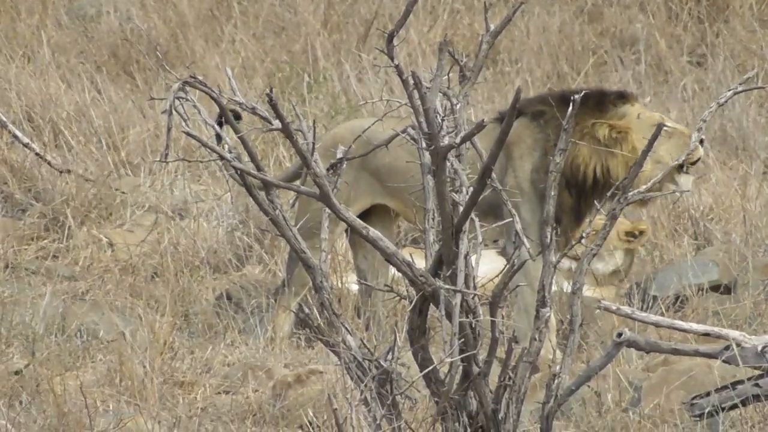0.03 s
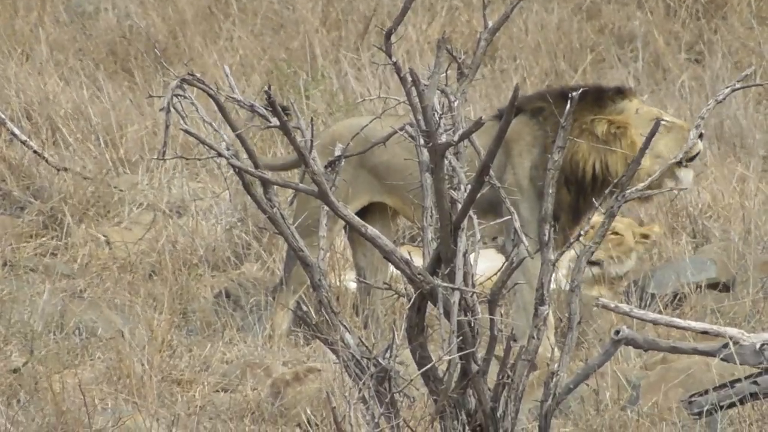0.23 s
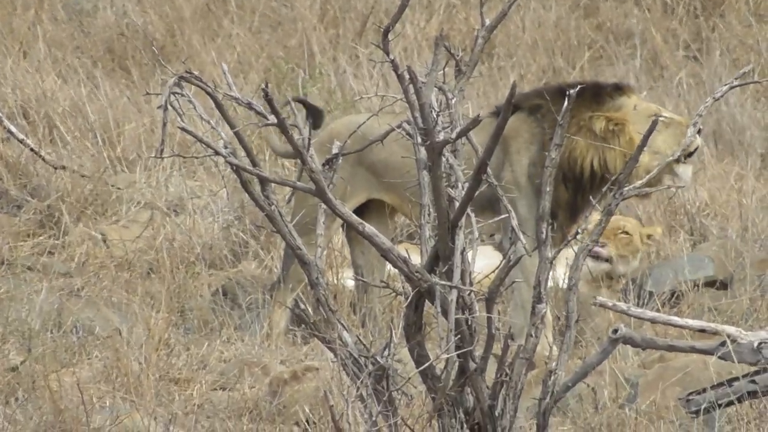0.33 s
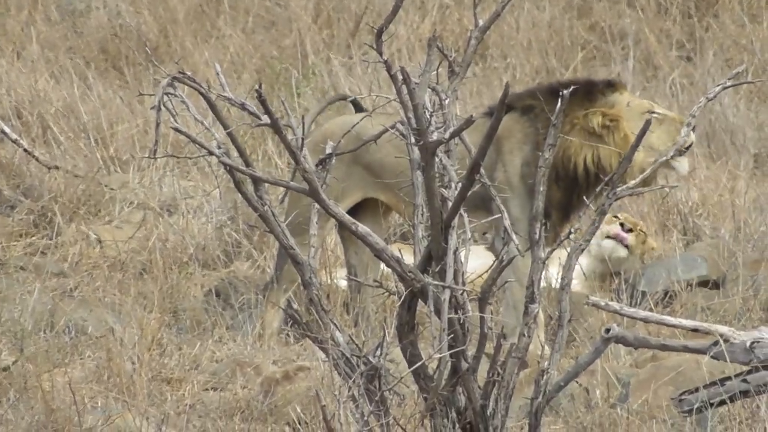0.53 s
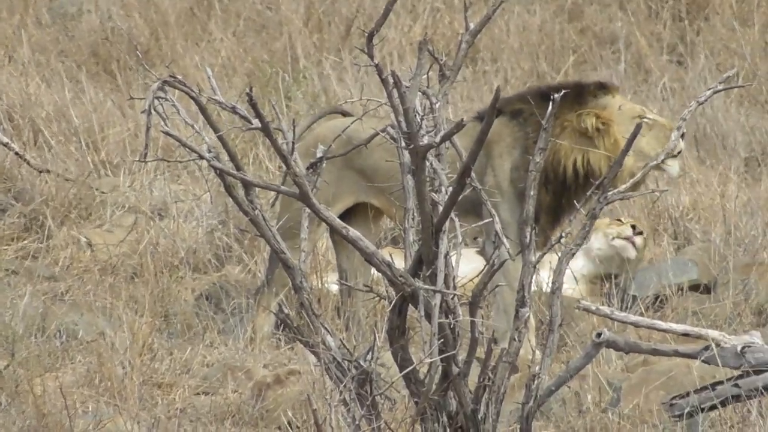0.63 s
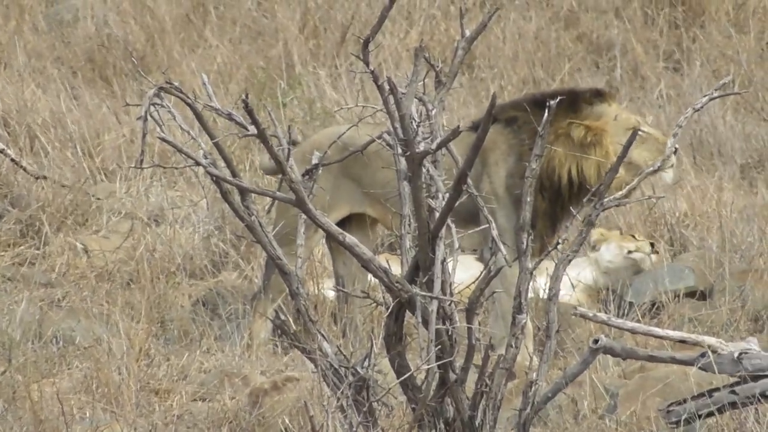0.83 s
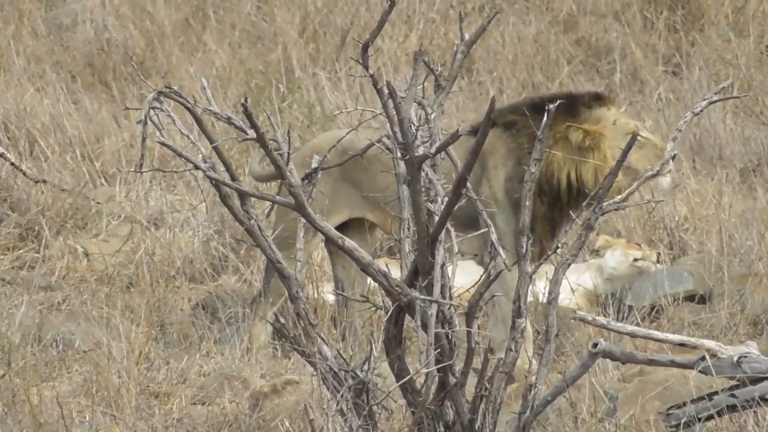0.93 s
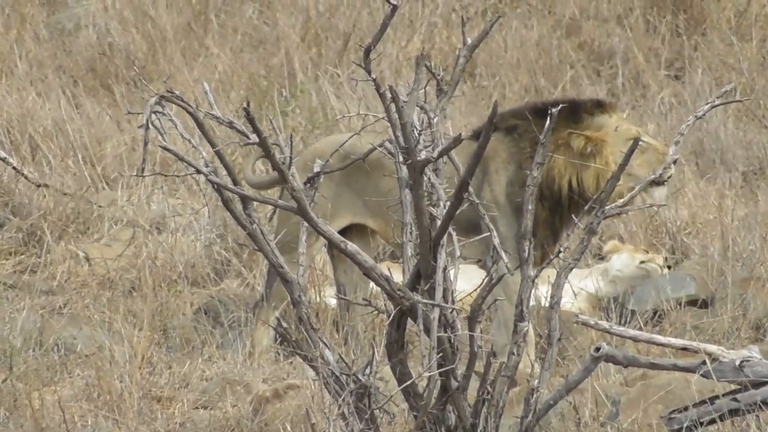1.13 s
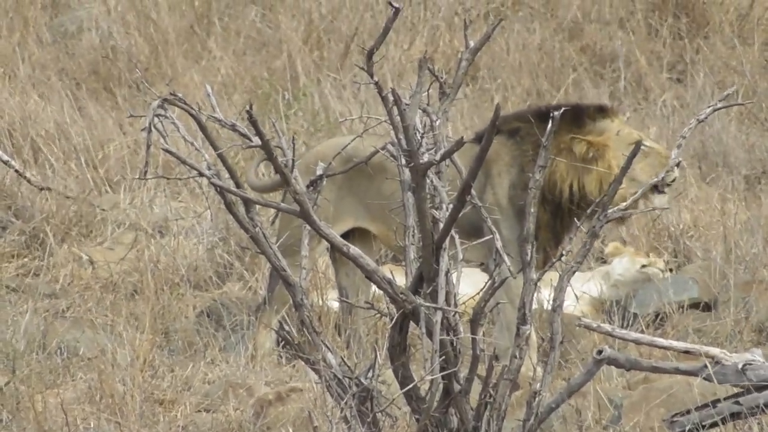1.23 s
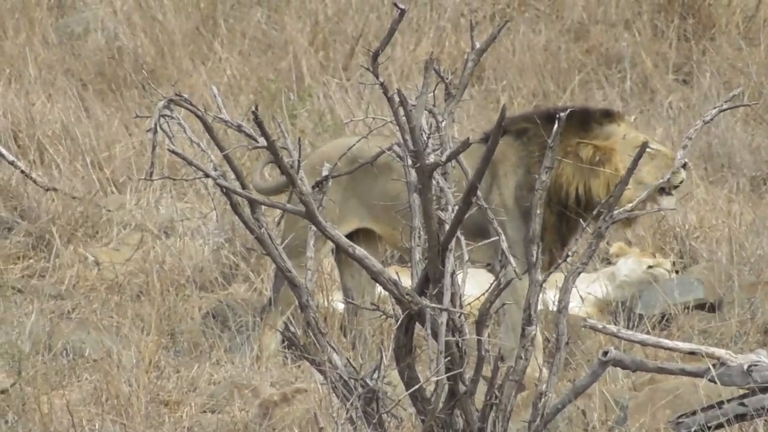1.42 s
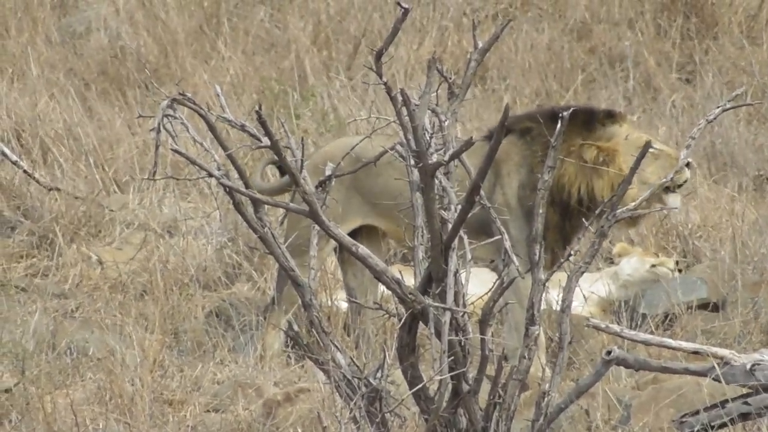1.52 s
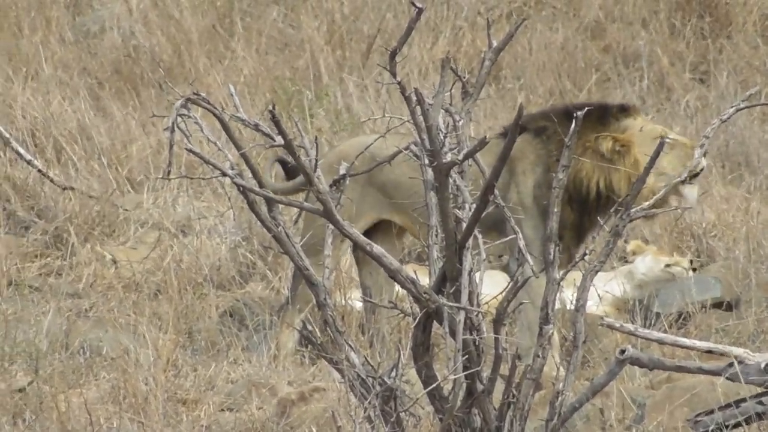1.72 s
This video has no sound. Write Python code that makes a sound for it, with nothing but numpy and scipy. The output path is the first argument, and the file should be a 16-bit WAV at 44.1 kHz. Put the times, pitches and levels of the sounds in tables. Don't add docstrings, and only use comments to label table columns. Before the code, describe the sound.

A lion some way off gives one low moan that rises, sags and closes in a breathy rasp; faint echoes follow in open dry bush, wind buffets the handheld microphone, then a hand bumps the camera.

```python
import sys
import numpy as np
from scipy import signal
from scipy.fft import rfft, irfft
from scipy.io import wavfile
from scipy.ndimage import uniform_filter1d

SR = 44100
rng = np.random.default_rng(int(sys.argv[2]) if len(sys.argv) > 2 else 0)


def inscribe(sig):
    pcm = np.round(np.clip(np.atleast_2d(sig).T, -1, 1) * 32767)
    wavfile.write(sys.argv[1], SR, pcm.astype(np.int16))


def gain_from_db(level_db):
    decades = np.asarray(level_db, float) / 20
    return 10 ** decades


N = 79380
T = np.arange(N) / SR
RATTLE_S = 1.429

# (frequency [Hz], width [Hz], level [dB])
THROAT = [(433, 247, -7), (608.4, 107, 0.5), (827, 180, -21.5), (1180, 123, -16), (1367, 78, -20)]


def evened(x):
    return x / np.sqrt(np.mean(x ** 2) + 1e-20)


def read(points, hz):
    f, value = np.transpose(points)
    return np.interp(np.log(hz + 1), np.log(f + 1), value)


def curve(points):
    return np.interp(T, *np.transpose(points))


def hump(s, length):
    return np.exp(-.5 * ((T - s) / length) ** 2)


def wander(span):
    return evened(uniform_filter1d(uniform_filter1d(rng.standard_normal(N), span), span))


def resonance_gain(hz, peaks):
    return sum(gain_from_db(db) / (1 + (2 * (hz - f) / width) ** 2) for f, width, db in peaks)


def coloured(x, peaks):
    gain = resonance_gain(np.fft.rfftfreq(N, 1 / SR), peaks)
    return evened(irfft(rfft(x) * gain, N))


def port_turn(hz):
    # (frequency [Hz], left port's lead [rad])
    lead = [(30, 0), (150, 0.06), (700, 0.7), (1460, 0.4), (3000, 0.2), (9000, 0.1), (12000, 1)]
    # (frequency [Hz], left minus right [dB])
    lean = [(60, -1), (200, -2.67), (700, -0.4), (1290, 2), (2400, 1.5), (4400, -0.5)]
    return np.exp(.5j * read(lead, hz)) * gain_from_db(read(lean, hz) / 2)


def ports(x):
    turn = port_turn(np.fft.rfftfreq(N, 1 / SR))
    return irfft(rfft(x) * np.array([turn, 1 / turn]), N)


def bed(spectrum, level_db, low_hz, high_hz, swell_db):
    # (frequency [Hz], left-right likeness [0-1])
    likeness = [(30, 0.6), (80, 0.85), (300, 0.88), (640, 1), (1400, 1), (2200, 0.97), (3500, 0.98),
                (6000, 1), (8500, 0.83), (12000, 0.069)]
    patch_db, flicker_db = 0.77, 0.5
    frames, hz = N // 256 + 5, np.fft.rfftfreq(1024, 1 / SR)
    a, b, c, d, patches = rng.standard_normal((frames, 513, 5)).T
    patches = evened(uniform_filter1d(uniform_filter1d(patches, size=8, axis=0), size=8, axis=1))
    flicker = evened(uniform_filter1d(rng.standard_normal(frames), size=2))

    same = np.clip(read(likeness, hz), -1, 1)[:, None]
    left = a + 1j * b
    right = same * left + np.sqrt(1 - same ** 2) * (c + 1j * d)
    turn = port_turn(hz)[:, None]
    z = np.array([left * turn, right / turn])

    level = read(spectrum, hz)[:, None] + patch_db * patches + flicker_db * flicker
    band = ((hz > low_hz) & (hz <= high_hz))[:, None]
    noise = signal.istft(z * gain_from_db(level) * band, nperseg=1024, noverlap=768)[1][:, :N]
    return gain_from_db(level_db + swell_db) * evened(noise)


def wind():
    # (frequency [Hz], density [dB per Hz])
    blow = [(15, -1), (32, 9.5), (60, -7), (110, -11), (180, -3.5), (300, -25.5)]
    # (time [s], level [dB])
    strength = [(0, 5.5), (.2, 4.5), (.3, 3), (.7, -1), (.8, 6.5), (1.0, 2.5), (1.25, 1.5), (1.6, 0),
                (1.72, 6), (1.8, 1)]
    return bed(blow, -45, 12, 300, curve(strength) + 1.54 * wander(1500))


def wash():
    # (frequency [Hz], density [dB per Hz])
    spectrum = [(110, -32), (180, -5.5), (393, -4), (415, -7.5), (605, -6.5), (723, -11), (889, -11),
                (1700, -28), (2210, -56), (3740, -120)]
    return bed(spectrum, -46.5, 170, 1600, 2 - 1.5 * T)


def hiss():
    # (frequency [Hz], density [dB per Hz])
    spectrum = [(1500, -4), (1900, -2.5), (2820, -9.5), (3700, -8), (5000, -16), (8400, -5), (11000, -10.5),
                (15800, -12)]
    return bed(spectrum, -58, 1600, 15800, 0)


def air():
    lean_db = -1.0
    return (wind() + wash()) * gain_from_db(lean_db * np.array([[.5], [-.5]])) + hiss()


def chest_tone(angle, effort_db):
    # (time [s], length [s], depth [0-1], strong-weak pulses [0-1])
    catches = [
        (.257, .012, .6, 0),
        (.78, .013, .38, .2),
    ]
    grip = 1 - sum(hump(s, n) * (deep + sub * np.cos(angle / 2)) for s, n, deep, sub in catches)
    level_db = uniform_filter1d(effort_db, size=600) + 0.53 * wander(400)
    return np.sqrt(2) * gain_from_db(level_db) * grip * np.sin(angle)


def throat_partials(hz, angle, stretch):
    shimmer_db, loosen_s, loosen_len_s = 1.2, .76, .012
    smear = .16 + .4 * np.maximum(T - .4, 0)
    partials = np.zeros(N)
    for k in range(3, 12):
        gain = resonance_gain(k * hz / stretch, THROAT) * gain_from_db(shimmer_db * wander(500))
        blur = smear * np.sqrt(max(k - 4, 0)) * 2 * wander(350)
        partials += gain * np.sin(k * angle + blur + 2 * np.pi * rng.random())
    return partials * (0.24 + 0.82 / (1 + np.exp((T - loosen_s) / loosen_len_s)))


def throat_breath(angle):
    return coloured((1 + 0.81 * np.cos(angle)) * rng.standard_normal(N), THROAT)


def closing_rasp():
    # (time [s], length [s], level [dB])
    puffs = [
        (.66, .04, -59),
        (.725, .02, -55),
        (.838, .014, -47.5),
        (.885, .016, -55),
        (.93, .03, -57),
        (1.04, .06, -61),
    ]
    # (frequency [Hz], width [Hz], level [dB])
    rasp = [(766, 210, 16), (1330, 370, 9.5), (2140, 180, 3), (3570, 440, -1), (4440, 660, -9.5),
            (6050, 1500, -11)]
    level = sum(gain_from_db(db) * hump(s, n) for s, n, db in puffs)
    return level * gain_from_db(2.5 + 1.9 * wander(300)) * coloured(rng.standard_normal(N), rasp)


def lion():
    # (time [s], pitch [Hz])
    pitch = [(.18, 123.1), (.29, 155.8), (.36, 172.5), (.42, 178), (.49, 170.5), (.54, 156), (.64, 146.5),
             (.75, 140.5), (.84, 128.6)]
    # (time [s], chest tone [dB])
    effort = [(.17, -44), (.225, -28.5), (.35, -28.5), (.39, -23.5), (.52, -23.5), (.58, -19), (.825, -20),
              (.865, -28.5), (.895, -41.5)]
    # (time [s], mouth opening [dB], throat stretch [factor])
    mouth = [(.16, -8.5, 0.72), (0.226, 0.5, 0.73), (0.289, 2, 0.94), (.4, -0.5, 0.99), (.5, 0, 0.98),
             (.6, 1, 1.0), (.715, 3, 1.04), (.75, -0.5, 1.18), (0.859, -0.5, 1.1)]
    hz = uniform_filter1d(curve(pitch), size=1300) * (1 + 0.0062 * wander(250))
    angle = 2 * np.pi * np.cumsum(hz) / SR
    when, open_db, stretch = np.transpose(mouth)
    open_db, stretch = np.interp(T, when, open_db), np.interp(T, when, stretch)

    chest = chest_tone(angle, curve(effort))
    partials = gain_from_db(-40.5) * np.sqrt(2) * throat_partials(hz, angle, stretch)
    breath = gain_from_db(-46.5) * throat_breath(angle)
    on = (T > effort[0][0]) * np.clip(1 - (T - effort[-1][0]) / .02, 0, 1)
    return on * (chest + gain_from_db(open_db) * (partials + breath)) + closing_rasp()


def bush(x):
    t60_s = .9
    t = np.arange(SR) / SR
    hits = rng.choice([-1., 1.], (2, SR)) * (rng.random((2, SR)) < .04)
    taps = hits * gain_from_db(-60 * t / t60_s) * (t > .02)
    taps = 0.23 * taps[:1] + .5 * taps
    return signal.fftconvolve(x[None], taps / np.linalg.norm(taps[0]), axes=1)[:, :N]


def slope_echoes():
    # (time [s], length [s], level [dB], frequency [Hz])
    echoes = [
        (.93, .018, -42, 146),
        (1.009, 0.0077, -40, 145),
        (1.065, 0.013, -37, 144),
        (1.163, .025, -41.5, 141),
    ]
    return sum(np.sqrt(2) * gain_from_db(db) * hump(s, n) * np.sin(2 * np.pi * f * T) for s, n, db, f in echoes)


def knocks():
    # (time [s], peak [dB], ring [Hz], left minus right [dB])
    hits = [
        (1.4185, -29, 110, 0),
        (1.4260, -14.5, 140, 1),
        (1.4292, -35, 1300, 0),
        (1.4298, -16, 310, 1),
        (1.4302, -25, 640, 0),
        (1.4385, -24, 330, 6),
        (1.4408, -19, 200, 13),
        (1.4535, -25, 95, 0),
    ]
    cycles, right_lag_s = 1.3, .0006
    out = np.zeros((2, N))
    for s, db, hz, lean_db in hits:
        u = np.maximum(T - s - right_lag_s * np.array([[0], [1]]), 0) * hz
        ring = np.sin(2 * np.pi * u) * np.minimum(u / 0.25, 1) * np.exp(-(u / cycles) ** 2)
        out += ring * gain_from_db(db + lean_db * np.array([[.5], [-.5]]))
    return out


def rattle():
    split_hz, top_hz, t60_s = 600, 1300, .13
    low_band = signal.butter(2, [220, split_hz], "band", fs=SR, output="sos")
    top_band = signal.butter(3, [split_hz, top_hz], "band", fs=SR, output="sos")
    low = signal.sosfilt(low_band, rng.standard_normal((2, N)))
    top = signal.sosfilt(top_band, rng.standard_normal((2, N)))
    noise = evened(low) + gain_from_db(-8) * evened(top)
    noise = noise - .15 * noise[::-1]
    u = np.maximum(T - RATTLE_S, 0)
    return gain_from_db(-27 - 60 * u / t60_s) * np.minimum(u / 0.0046, 1) * evened(noise)


def bump():
    push = gain_from_db(-30) * hump(1.414, .005)
    body = signal.butter(4, 1700, fs=SR, output="sos")
    return signal.sosfilt(body, knocks() - push + rattle())


def scene():
    bush_db = -19
    voice = lion()
    return air() + ports(voice + slope_echoes()) + gain_from_db(bush_db) * bush(voice) + bump()


def band_limit(x):
    return signal.sosfilt(signal.butter(12, 16130, fs=SR, output="sos"), x)


def record(dry):
    duck_db, recover_s = -5.5, 0.038
    u = T - RATTLE_S
    dip = (u > 0) * np.exp(-np.maximum(u, 0) / recover_s) * np.clip(u / .01, 0, 1)
    return band_limit(dry * gain_from_db(duck_db * dip))


dry = scene()
out = record(dry)
inscribe(out)
```